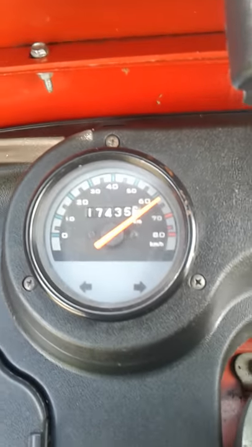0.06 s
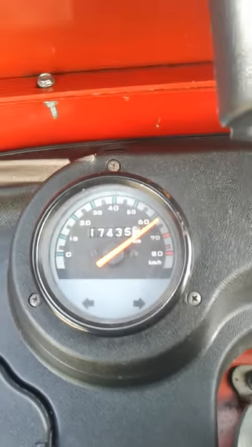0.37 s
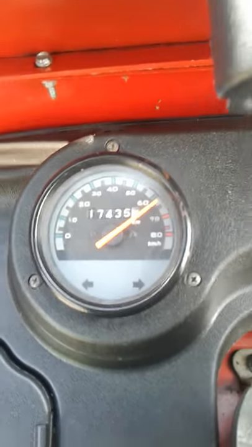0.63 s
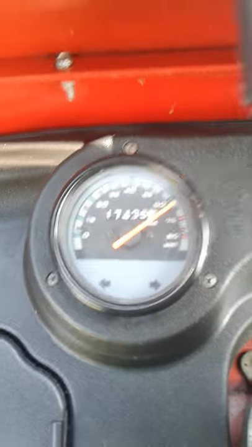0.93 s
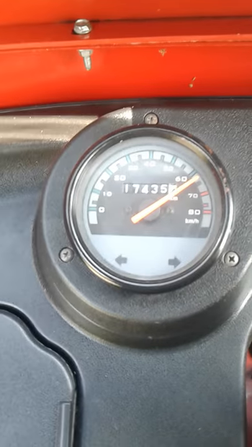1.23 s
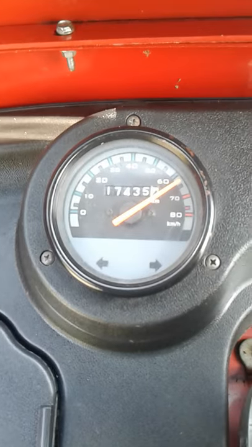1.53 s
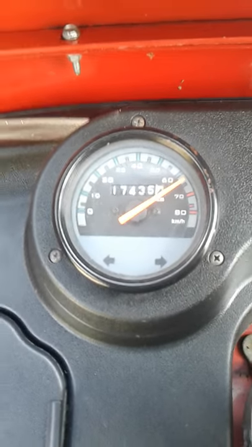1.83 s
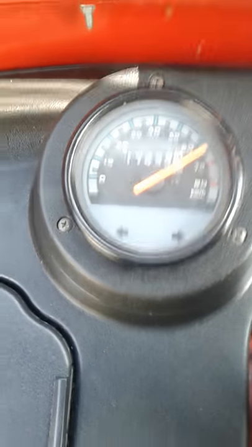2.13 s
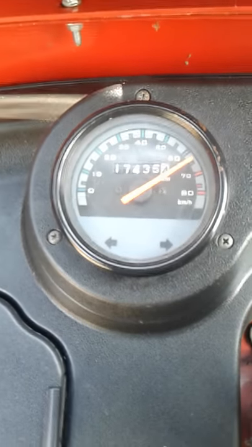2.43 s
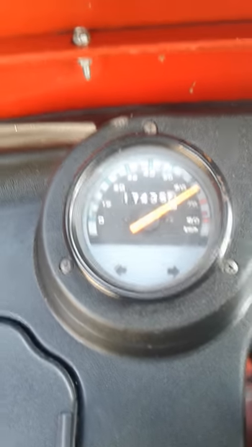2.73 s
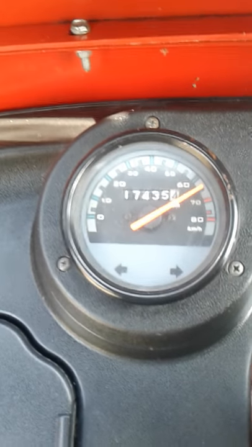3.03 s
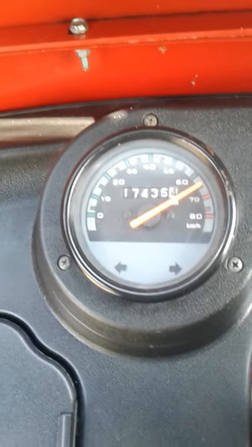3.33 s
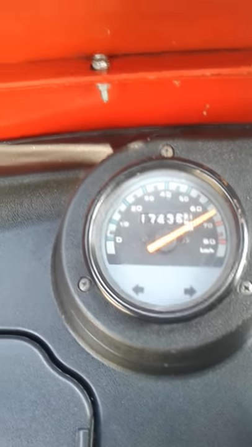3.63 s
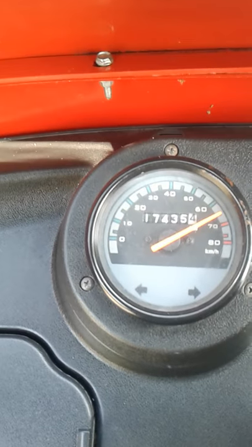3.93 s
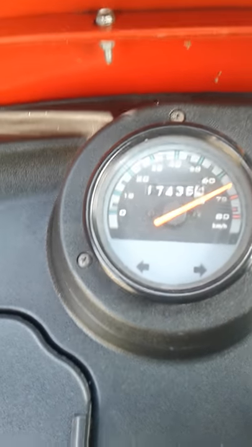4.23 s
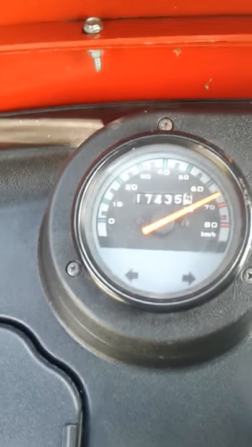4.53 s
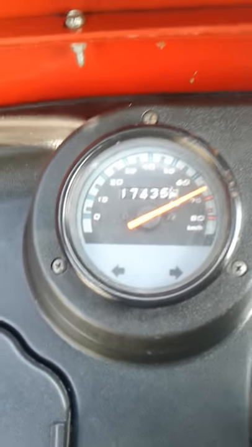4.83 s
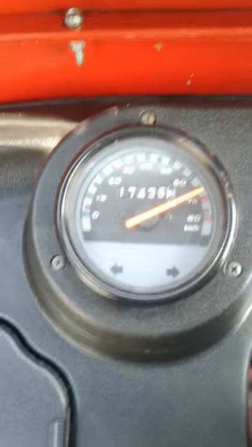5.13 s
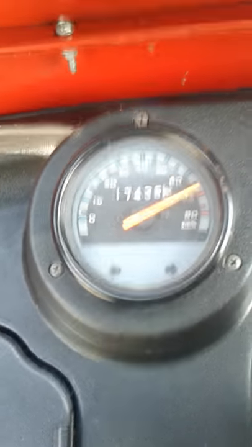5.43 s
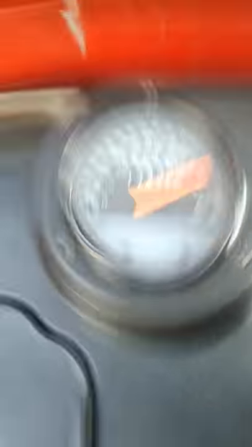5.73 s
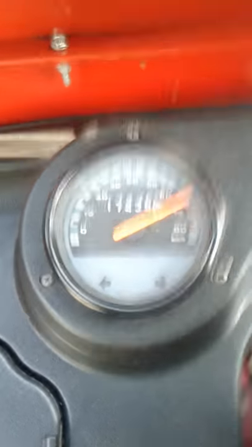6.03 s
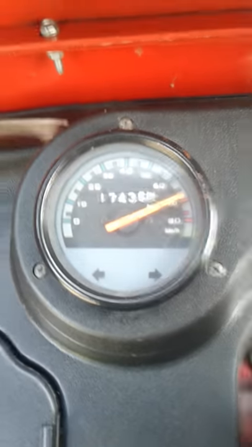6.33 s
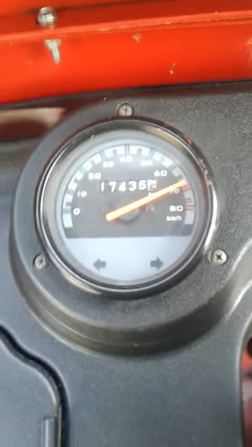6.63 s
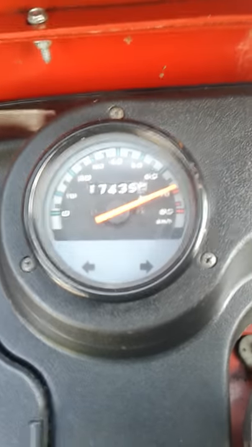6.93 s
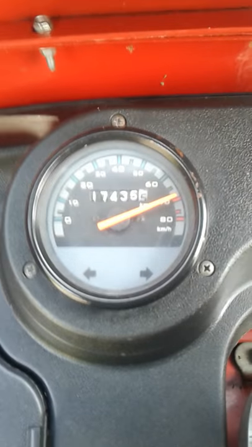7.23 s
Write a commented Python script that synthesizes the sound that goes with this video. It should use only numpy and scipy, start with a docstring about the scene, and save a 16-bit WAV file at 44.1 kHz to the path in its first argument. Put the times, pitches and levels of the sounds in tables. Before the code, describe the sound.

A small three-wheeler's single-cylinder engine runs at full throttle, heard close from inside the open cab. Its loud, low drone climbs very slowly in pitch over constant mechanical clatter, while the body panels buzz and faintly whine. Wind rumble and tyre hiss build as the speed creeps up. Near the end a loose part gives a few faint, bright ticks, and the engine keeps pulling.

```python
"""Auto-rickshaw cab at full throttle

A one-cylinder four-stroke engine slowly gains speed, droning on its low crank orders. Higher orders
sweep through the resonances of the body panels over mechanical clatter. Wind buffets the open cab,
tyres hiss and a loose part ticks."""
import sys
import numpy as np
from scipy import signal
from scipy.fft import rfft, irfft
from scipy.io import wavfile
from scipy.ndimage import uniform_filter1d, minimum_filter1d

SR = 44100
rng = np.random.default_rng(int(sys.argv[2]) if len(sys.argv) > 2 else 0)


def unload_wav(signal):
    """Save mono or channel-first audio to the path in sys.argv[1] as 16-bit WAV at rate SR, clipped to [-1, 1]."""
    wavfile.write(
        sys.argv[1],
        SR,
        np.round(np.clip(np.atleast_2d(signal).T, -1, 1) * 32767).astype(np.int16),
    )


N = 329868
TIME = np.arange(N) / SR
HZ = np.fft.rfftfreq(N, 1 / SR)

# The engine's slow climb: time_s, turns_per_s
CRANK_SPEED = [(0.0, 51.0), (1.3, 51.67), (1.6, 51.66), (2.4, 52.27), (3.7, 53.52), (4.2, 54.13),
               (5.2, 54.95), (6.2, 55.37), (6.9, 56.15), (7.48, 56.31)]
# Low orders that make the cab boom: crank_order, off_resonance_db
BOOM_ORDERS = [(2, -20), (4, -27), (6, -30)]
# The rest of the low drone: crank_order, slowest_db, fastest_db
DRONE_ORDERS = [(1, -38, -32), (3, -27.5, -20.5), (5, -40.5, -34.5), (7, -34.5, -46), (8, -47, -35)]
# Block vibration, with half orders from firing every second turn: crank_order, off_resonance_db
BLOCK_ORDERS = [(9, -53), (10, -47), (11, -48), (13, -51.5), (14, -55), (15, -49), (16, -46.5), (17, -46.5),
                (18, -42.5), (19, -52), (19.5, -49.5), (20, -48), (21, -50.5), (21.5, -52.5), (22, -47.5),
                (22.5, -50.5), (23, -55.5), (25, -49.5), (27, -55.5), (28, -53), (29, -48.5), (30, -51),
                (31, -56.5), (32, -52), (33, -54.5), (35, -53.5), (36, -55), (37, -50), (39, -57),
                (40, -57.5), (42, -60), (43, -61)]
# Orders that whine: crank_order, off_resonance_db
WHINE_ORDERS = [(12, -44.5), (20.5, -39), (26, -51.5), (41, -51.5), (61, -59.5)]
# Air resonances of the cab: pitch_hz, width_hz, lift_db
CAB_MODES = [(110.5, 12.7, 9.5), (202.65, 26.7, 18), (317.5, 11, 4.5), (333.7, 29, 5.5)]
# Body panel resonances: pitch_hz, width_hz, lift_db
PANEL_MODES = [(557, 13, 6.5), (605.5, 44, 11.5), (727, 36, 11.5), (813, 27, 10), (1045, 45, 7.5),
               (1172, 47, 10.5), (1446, 54, 8.5), (1682, 48, 11), (1848, 25, 7), (2196, 53, 2.5),
               (2296, 43, 9), (3330, 70, 7.5), (3620, 60, 6), (4420, 95, 8), (5470, 70, 17.5),
               (6750, 100, 7), (7160, 120, 10)]
# Sharp rings of the thin sheet metal: pitch_hz, width_hz, lift_db
SHEET_MODES = [(618, 26, 8.5), (641, 15, 11), (1050, 15, 13.5), (1152, 16, 7.5), (1410, 12, 14),
               (1450, 28, 17.5), (2142, 27, 11.5), (2260, 34, 17), (3385, 44, 17)]
# Tone colour of the tyres and passing air: frequency_hz, relative_db
ROAD_SPECTRUM = [(30, -32.5), (100, -10.5), (450, -6), (750, 1.5), (1200, -7), (2000, -8), (2700, -19.5),
                 (3600, -18), (4400, -22), (7200, -24.5), (8000, -35), (9800, -43.5), (12100, -34),
                 (13500, -43.5), (15700, -44)]
# Tone colour of the wind: frequency_hz, relative_db
WIND_SPECTRUM = [(20, -35.5), (45, -24.5), (75, -12.5), (105, -7), (135, -1), (190, -7), (260, -11),
                 (350, -17), (480, -24.5), (900, -31.5), (3000, -69)]
# Tone colour of the engine clatter: frequency_hz, relative_db
CLATTER_SPECTRUM = [(30, -41.5), (150, -18.5), (300, -16), (480, -19), (620, -10.5), (850, -3.5),
                    (1130, -1), (1320, -6), (1600, -7), (1800, -11.5), (2150, -4.5), (2550, -17.5),
                    (3500, -14.5), (4300, -25), (7200, -26.5), (8100, -41), (12000, -42), (15000, -50)]
# Level range of the tyre roar: slowest_db, fastest_db
ROAR_DB = (-35.5, -24)
# Ticks of the loose part: start_s, level_db, decay_s
RATTLE_TICKS = [(5.782, -47, .012), (5.868, -40, .014), (5.880, -48, .012), (5.957, -46, .012),
                (6.21, -52, .01), (6.343, -52, .01)]


def gain_of(db):
    """Decibels to amplitude."""
    return 10 ** (np.asarray(db) / 20)


def unit_rms(x):
    """Scales to rms 1."""
    return x / np.sqrt(np.mean(x ** 2) + 1e-20)


def spectrum_db(points):
    """An EQ curve through the points, joined on a log-frequency axis."""
    hz, db = np.transpose(points)
    return np.interp(np.log(HZ + 1), np.log(hz), db)


def coloured(x, eq_db):
    """Shapes x with an EQ curve; rms 1."""
    return unit_rms(irfft(rfft(x) * gain_of(eq_db), N))


def wander(rate_hz):
    """Smooth random drift of rms 1, up to about rate_hz."""
    steps = np.arange(0, N, 64)
    hz = np.fft.rfftfreq(len(steps), steps[1] / SR)
    noise = rng.standard_normal(len(steps))
    drift = irfft(rfft(noise) / (1 + (hz / rate_hz) ** 2), len(steps))
    return np.interp(np.arange(N), steps, unit_rms(drift))


def lift_db(modes, hz):
    """How much a set of resonances lifts a vibration at hz."""
    return sum(db / (1 + (2 * (hz - pitch) / width) ** 2) for pitch, width, db in modes)


def cab_ripple(width_hz=35):
    """Reflections in the cab leave fine peaks and dips in the spectrum; rms 1."""
    delay_s = np.fft.rfftfreq(len(HZ), HZ[1])  # later echoes carve finer ripples
    echoes = rfft(rng.standard_normal(len(HZ))) * np.exp(-(delay_s * width_hz) ** 2)
    return unit_rms(irfft(echoes, len(HZ)))


def road(pace, panel_ring=0.16, ripple_db=1.5, swell_db=0.4):
    """Tyre roar and the hiss of passing air grow with speed, coloured by the cab."""
    eq_db = spectrum_db(ROAD_SPECTRUM) + panel_ring * lift_db(PANEL_MODES, HZ) + ripple_db * cab_ripple()
    roar = coloured(rng.standard_normal(N), eq_db)
    slow_db, fast_db = ROAR_DB
    return roar * gain_of(slow_db + (fast_db - slow_db) * pace + swell_db * wander(8))


def wind(pace, level_db=-25.5, rise_db=6, gust_db=0.3):
    """Air tumbles round the open cab, harder with speed."""
    rumble = coloured(rng.standard_normal(N), spectrum_db(WIND_SPECTRUM))
    return rumble * gain_of(level_db + rise_db * pace ** 3 + gust_db * wander(2))


def loose_part(low_cut_hz=4500):
    """A loose part rattles in short, bright, grainy ticks."""
    envelope = np.zeros(N)
    for start_s, level_db, decay_s in RATTLE_TICKS:
        age = np.maximum(TIME - start_s, 0) / decay_s
        envelope += gain_of(level_db) * (TIME > start_s) * np.exp(-age ** 2)
    grains = rng.standard_normal(N) * rng.exponential(1, N)
    low_cut_db = -10 * np.log10(1 + (low_cut_hz / (HZ + 1)) ** 2)
    return envelope * coloured(grains, low_cut_db)


def clatter(turns, level_db=-26.5, panel_ring=0.24, uneven_db=0.64, ripple_db=2.27):
    """Piston and valve noise pulses at each stroke, turn and firing, and rings the panels."""
    angle = 2 * np.pi * turns
    stroke, turn, firing = np.cos(2 * angle), np.cos(angle), np.cos(angle / 2)
    pulse = 1 + 0.11 * stroke + 0.086 * turn + 0.048 * firing
    noise = rng.standard_normal(N) * pulse * gain_of(uneven_db * wander(25))
    eq_db = spectrum_db(CLATTER_SPECTRUM) + panel_ring * lift_db(PANEL_MODES, HZ)
    return gain_of(level_db) * coloured(noise, eq_db + ripple_db * cab_ripple())


def sheet_whine(turns, speed, level_db=-1, surge_per_order=0.014, max_surge=0.35, slip=0.16):
    """Single orders sing out in surges as they cross a sheet metal ring; the higher, the less steady."""
    out = np.zeros(N)
    for order, db in WHINE_ORDERS:
        surge = min(surge_per_order * order, max_surge)
        envelope = gain_of(db + lift_db(SHEET_MODES, order * speed)) * (1 + surge * wander(20))
        cycles = order * turns + slip * surge * wander(14)
        out += envelope * np.cos(2 * np.pi * cycles)
    return np.sqrt(2) * gain_of(level_db) * out


def block_buzz(turns, speed, level_db=2.5, flutter_at_1khz=0.3, flutter_hz=8):
    """Block orders swell as they pass panel resonances; no two firings are alike, so they flutter."""
    panel_gain = gain_of(lift_db(PANEL_MODES, HZ))
    out = np.zeros(N)
    for order, db in BLOCK_ORDERS:
        pitch_hz = order * speed
        flutter = 1 + flutter_at_1khz * pitch_hz / 1000 * wander(flutter_hz)
        envelope = gain_of(db) * np.interp(pitch_hz, HZ, panel_gain) * flutter
        out += envelope * np.cos(2 * np.pi * (order * turns + rng.random()))
    return np.sqrt(2) * gain_of(level_db) * out


def engine_drone(turns, speed, pace, boom_waver_db=0.24, waver_db=0.9, dispersion=0.12, odd_lag_rad=1.2):
    """Piston shake and exhaust: clean low orders, some booming near a cab resonance."""
    def tone(order, db):
        # the cab delays the higher orders more; odd ones run out of step
        lag_rad = dispersion * (order - 2) ** 2 + odd_lag_rad * (order % 2)
        return -np.sqrt(2) * gain_of(db) * np.cos(2 * np.pi * order * turns - lag_rad)
    out = np.zeros(N)
    for order, db in BOOM_ORDERS:
        out += tone(order, db + lift_db(CAB_MODES, order * speed) + boom_waver_db * wander(10))
    for order, slow_db, fast_db in DRONE_ORDERS:
        out += tone(order, slow_db + (fast_db - slow_db) * pace + waver_db * wander(2.1))
    return out


def scene(jitter_turns=0.002):
    """The mono mix: crank speed drives the engine, the wind and the tyres."""
    speed = np.interp(TIME, *np.transpose(CRANK_SPEED))
    pace = (speed - speed.min()) / np.ptp(speed)  # 0 slowest, 1 fastest
    # no two firings push alike, so the crank runs slightly unevenly
    turns = rng.random() + np.cumsum(speed) / SR + jitter_turns * wander(6.1)
    engine = engine_drone(turns, speed, pace) + block_buzz(turns, speed)
    engine += sheet_whine(turns, speed) + clatter(turns)
    return (engine + wind(pace) + road(pace) + loose_part())[None]


def record(dry, ceiling=0.9, window_samples=2200, high_cut_hz=15750):
    """A peak limiter holds the loudest beats under full scale; a steep high cut follows."""
    allowed_gain = np.minimum(1, ceiling / (abs(dry) + 1e-9))
    held_gain = minimum_filter1d(allowed_gain, window_samples)
    limited = dry * uniform_filter1d(held_gain, window_samples)
    high_cut = signal.firwin(1023, high_cut_hz, window=("kaiser", 9), fs=SR)
    return signal.oaconvolve(limited, high_cut[None], "same")


dry = scene()
out = record(dry)
unload_wav(out)
```